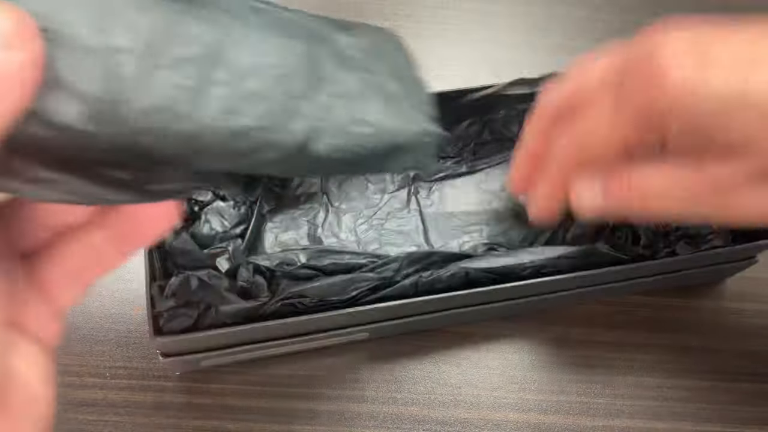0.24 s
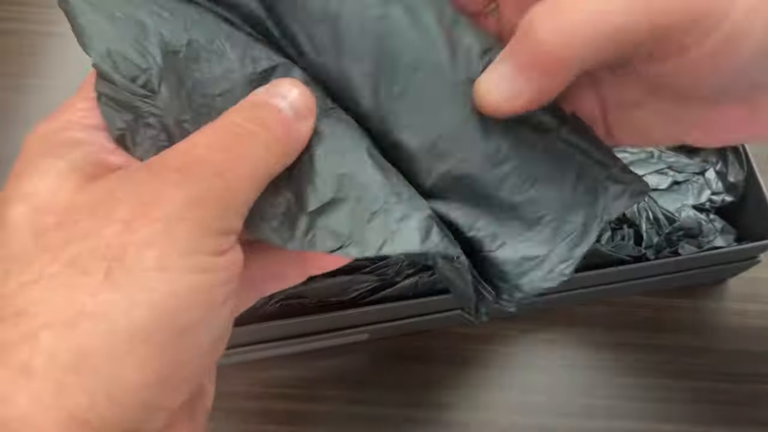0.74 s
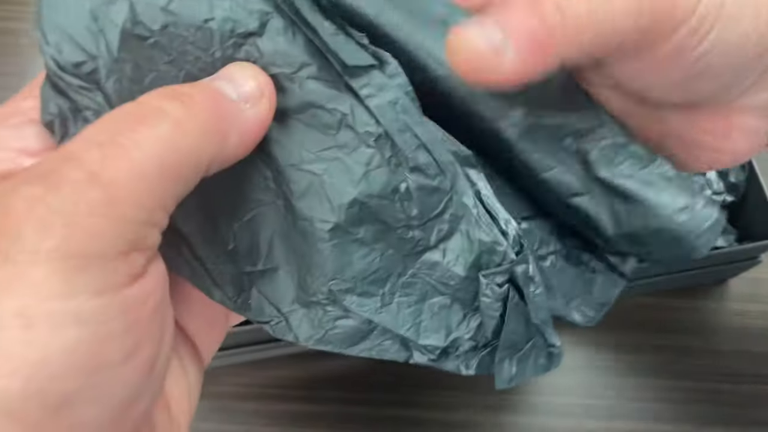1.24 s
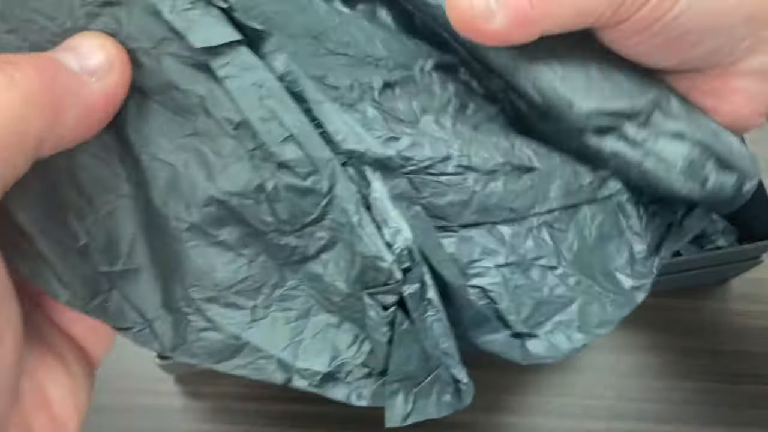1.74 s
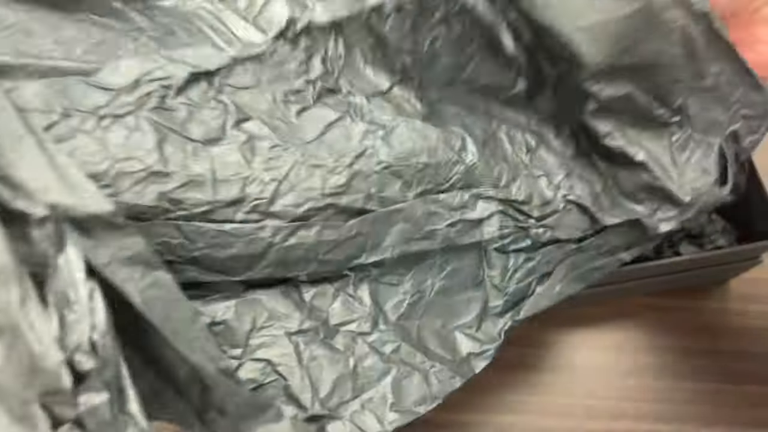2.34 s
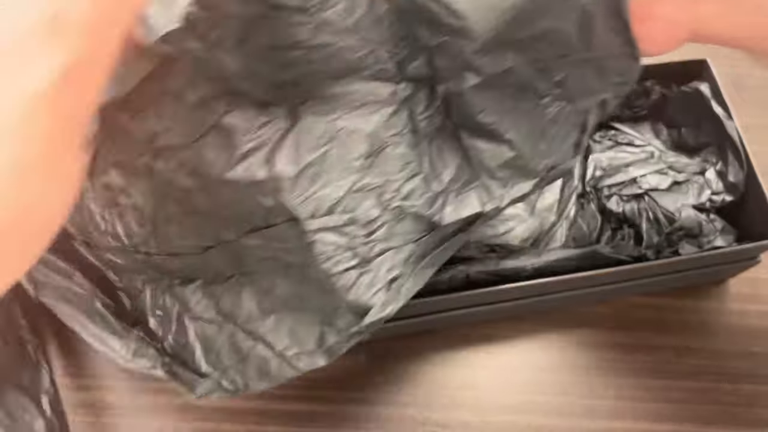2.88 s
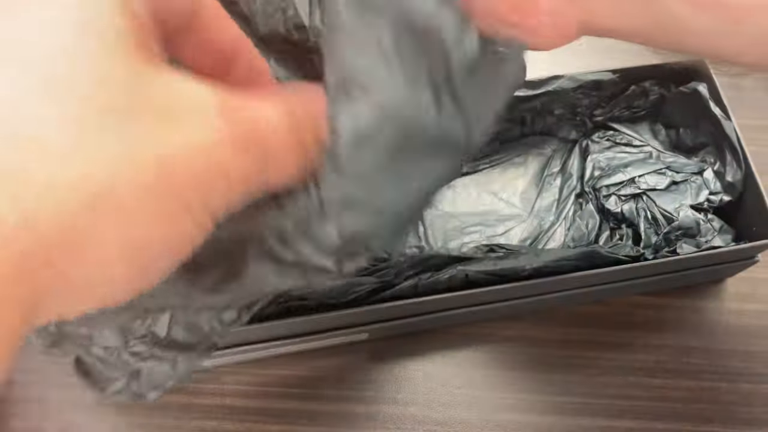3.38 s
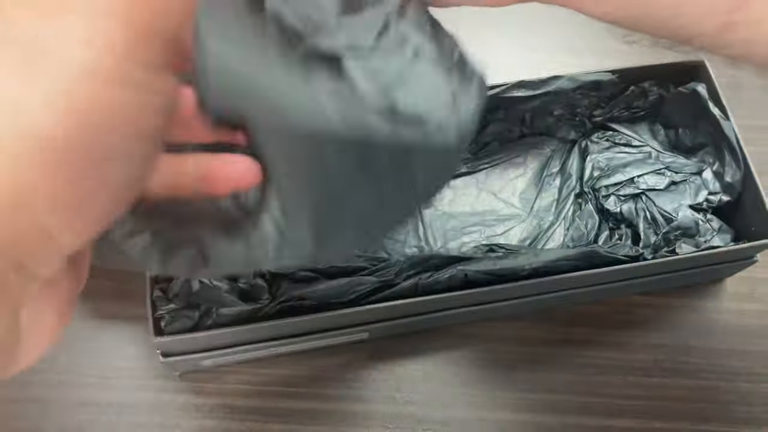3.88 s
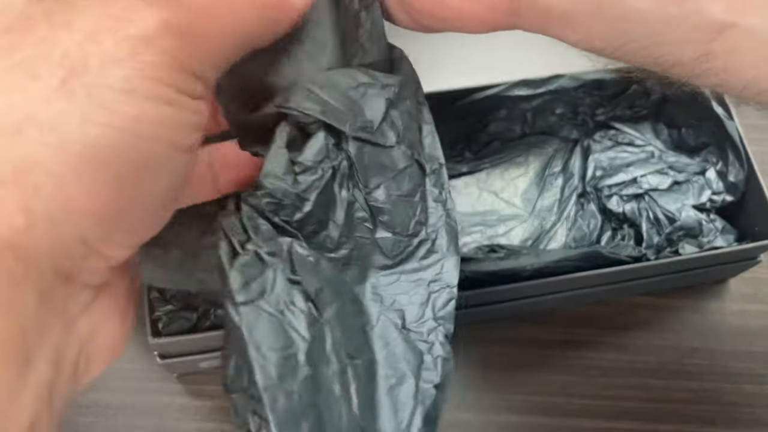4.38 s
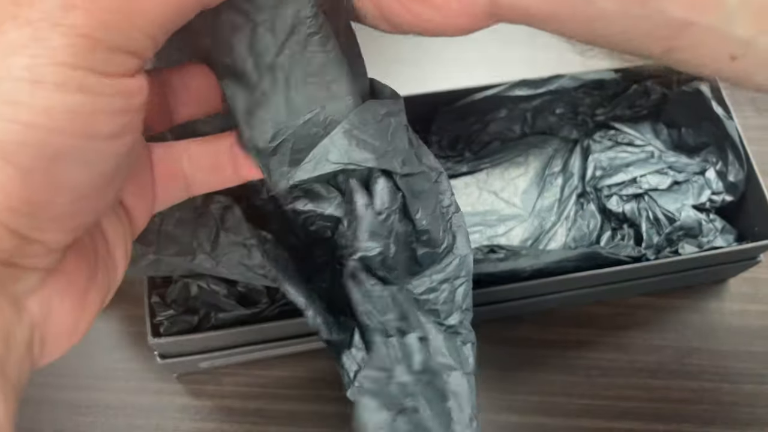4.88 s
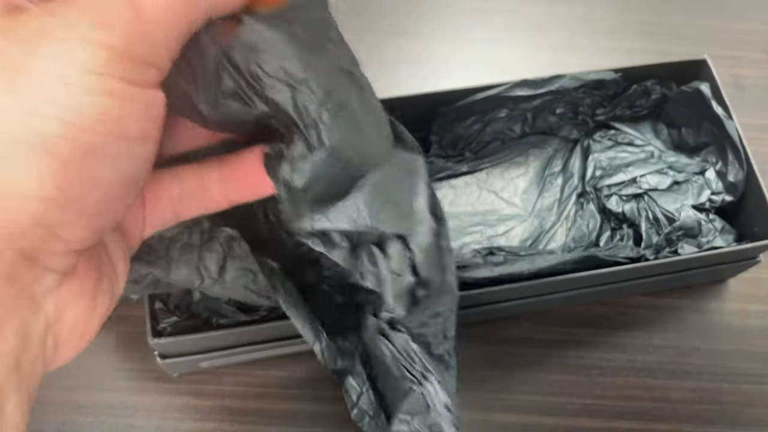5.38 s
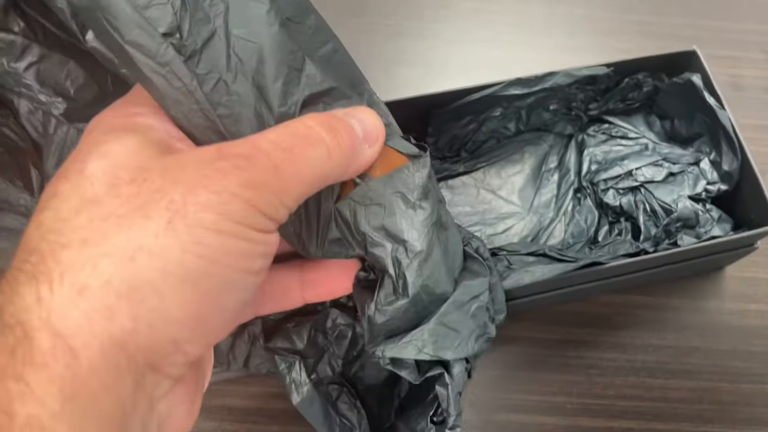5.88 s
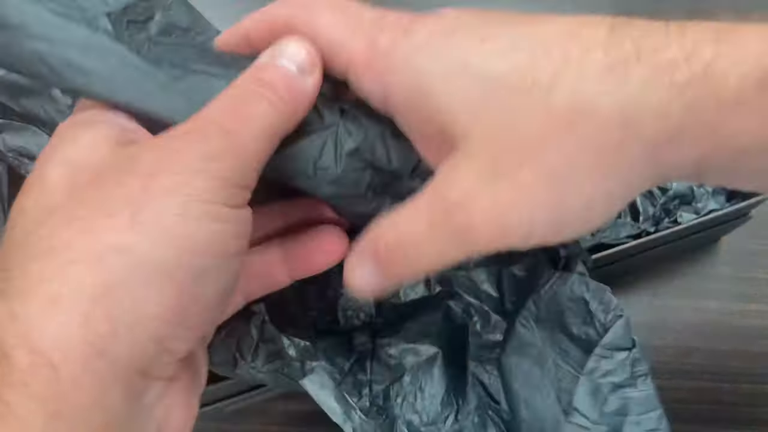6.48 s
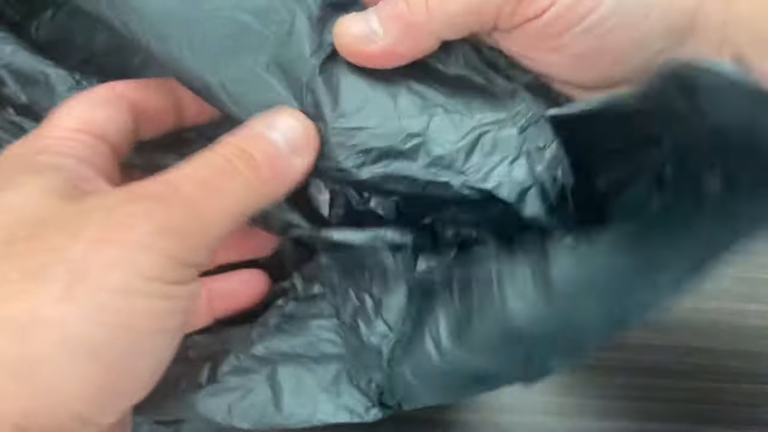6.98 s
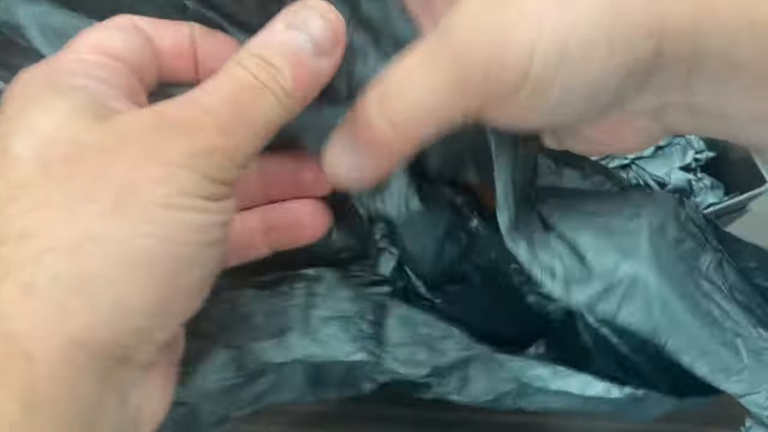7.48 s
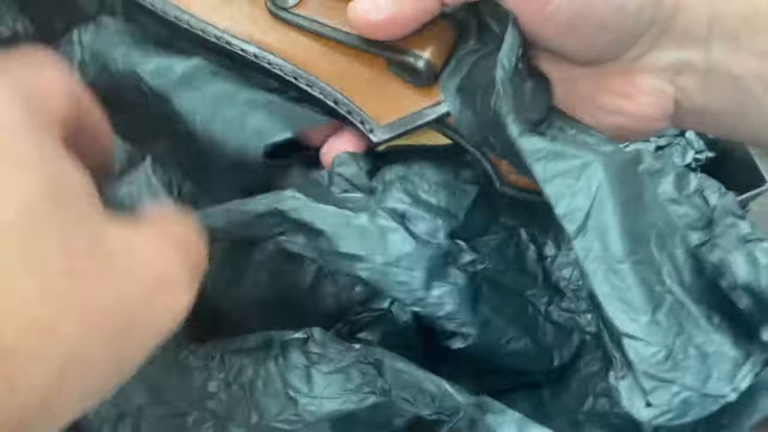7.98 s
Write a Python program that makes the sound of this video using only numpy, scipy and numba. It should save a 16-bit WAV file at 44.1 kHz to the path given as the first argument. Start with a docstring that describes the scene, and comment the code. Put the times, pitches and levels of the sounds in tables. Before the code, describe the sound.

Close to the microphone, hands unwrap an item from thin tissue paper in a small room. A light knock on a cardboard box comes right at the start, then the paper crinkles and rustles in short pulls with brief lulls. From about three seconds the rustling grows fuller and nearly continuous, dotted with sharp snaps, small pops and swishes of sliding layers. A faint low hum lies underneath.

```python
"""Unfolding tissue paper

Two hands unwrap an item from crumpled tissue above an open cardboard box on a desk. Thousands of tiny creases
buckle while the layers slide and the sheet billows; stiff folds pop or crack, fingers swish and the box is
knocked. A phone listens close by in stereo, over a small room's drone."""
import sys
import numpy as np
from scipy import signal
from scipy.fft import rfft, irfft, next_fast_len
from scipy.io import wavfile
from scipy.ndimage import map_coordinates
from numba import njit

SR = 44100
rng = np.random.default_rng(int(sys.argv[2]) if len(sys.argv) > 2 else 0)


def wrap_up_sound(samples):
    """Save the sound to the file named by the first command line argument, as 16-bit audio."""
    columns = np.atleast_2d(samples).T
    # keep every value between -1 and 1, then stretch to whole-number steps
    tamed = np.clip(columns, -1, 1)
    steps = np.round(tamed * 32767).astype(np.int16)
    wavfile.write(sys.argv[1], SR, steps)


N = 362943
TIME = np.arange(N) / SR
TOP_HZ = 15800  # upper limit of the creases and of the phone


# spectral envelope of the paper: f/Hz, level/dB
PAPER_SPECTRUM = [(60, -19), (200, -4.5), (350, 1.5), (500, -3), (660, 2), (820, -4.5), (1020, -2),
                  (1500, -5), (1850, -3), (3000, -4), (3900, -3), (5100, -4), (5750, -8.5), (7000, -2),
                  (8400, -0.5), (10000, 1), (13300, -0.5), (15700, -8)]
# band weights as the sheet opens: t/s, billow level/dB, wide fold level/dB, tight fizz level/dB
BEND_LEVELS = [(0.0, -15, -1.5, -1), (0.5, -12.5, -2.5, 3), (0.75, -10.5, -1.5, -2.5), (1.1, -11.5, -2, -1),
               (1.98, -14.5, -4, -0.5), (2.4, -8.5, -0.5, 0), (2.82, -16, -1.5, 2), (2.98, -5.5, -2.5, 2.5),
               (3.3, -5, -1, 3.5), (3.6, -7.5, -3, 2.5), (4.32, -6.5, -1.5, 2.5), (4.78, -8.5, -4, 1.5),
               (5.2, -11, -6, 3), (5.65, -8.5, -3.5, 4), (6.15, -10.5, 0.5, 1), (6.7, -6.5, -1.5, 1),
               (8.23, -7, -1, 2)]

def rustle(effort, slide_db=-4.5, surge_db=1.0, crackle_db=-11., patchy_db=0.92, billow_follow=0.71,
           edges_hz=(577., 2720., 7160.), crinkle_db=-0.5, fizz_db=-0.8):
    """Radiation from a sheet driven by buckling and friction: wide bends sound low, tight ones fizz."""
    billow, fold, fizz = curves(BEND_LEVELS)
    extra = effort - np.mean(effort)
    sliding = undb(slide_db + extra / 2) * rng.standard_normal((3, N))
    # one buckling crease sets off its neighbours, so the snaps come in surges
    grains = (creases(effort) + sliding) * undb(surge_db * walk(64))
    crackles = creases(effort, rate=260., spread_db=1.0, cycles=13.5, count=8000)  # few, pitched
    sheet = spectrum(hollow(grains + undb(crackle_db) * crackles)) * colour(PAPER_SPECTRUM)
    lowpasses = [1 / (1 + (bins() / edge) ** 8) for edge in edges_hz]
    bands = np.diff(lowpasses, axis=0, prepend=0, append=1)
    # the sheet keeps moving between pulls, so its billowing follows the effort only in part
    levels = (billow - (1 - billow_follow) * extra, fold, crinkle_db, fizz + fizz_db)
    out = 0
    for band, db in zip(bands, levels):
        patchy = irfft(sheet * band)[:, :N] * undb(patchy_db * walk(45))
        out = out + unit(patchy) * undb(effort + db)
    return out


def creases(effort, rate=4800., growth=.55, spread_db=0.5, cycles=2.44, shortest_s=7e-5, count=80000):
    """Buckling as a Poisson process: creases snap more often under effort and ring for a few cycles."""
    gap_draw, pitch_draw, decay_draw, *phases = rng.random((count, 6)).T
    size = undb(spread_db * np.minimum(rng.standard_normal(count), 2.5))
    activity = undb(growth * (effort - np.mean(effort)))
    expected_count = np.cumsum(activity) * rate / SR
    thresholds = np.cumsum(-np.log(1 - gap_draw))
    used = thresholds < expected_count[-1]
    start = np.searchsorted(expected_count, thresholds[used]) / SR
    hz = 150 + (TOP_HZ - 150) * pitch_draw[used] ** 2
    t60 = shortest_s + cycles * (.5 + decay_draw[used]) / hz
    size = size[used] * np.sqrt(np.sqrt(hz) / t60)  # equal energy per Hz
    # three paths: the direct sound, then each channel's own part
    paths = np.array([ring(start, hz, t60, size, 2 * np.pi * phase[used]) for phase in phases])
    return unit(paths / np.sqrt(activity))


def hollow(x, echo=0.21, lag_s=.0005, motion=0.454, motion_hz=11.85):
    """Comb filtering: reflections from the moving hands and folds shift the colour of the sound."""
    for lag, sign in ((lag_s, 1), (np.pi * lag_s, -1)):
        delayed = np.arange(N) - SR * lag * np.exp(motion * walk(motion_hz))
        x = x + sign * echo * np.array([map_coordinates(row, [delayed], order=3) for row in x])
    return x


# pulls of the hands: start t/s, duration/s, level/dB
HAND_PULLS = [(0.017,.116,-49), (0.426,.13,-49.5), (0.575,.249,-47), (0.86,.08,-43), (0.975,.095,-44.5),
              (1.2,.17,-49.5), (1.425,.16,-48), (1.611,.09,-51), (1.715,.06,-45), (1.86,.061,-46.5),
              (1.961,.125,-44.5), (2.125,.319,-49), (2.524,.132,-47.5), (2.845,.08,-51.5), (2.953,.105,-42),
              (3.09,.23,-45), (3.347,.156,-47.5), (3.548,.482,-46.5), (4.115,.235,-47), (4.369,.046,-44.5),
              (4.565,.1,-46.5), (4.67,.23,-45), (5.01,.085,-45), (5.38,.1,-46), (5.58,.29,-45),
              (5.89,.13,-48.5), (6.185,.4,-47.5), (6.655,.09,-44.5), (6.865,.337,-45), (7.209,.111,-42.5),
              (7.362,.088,-43.5), (7.475,.2,-45.5), (7.72,.08,-46.5), (7.83,.075,-42.5), (8.136,.097,-45.5)]
# crinkle while the paper is only held: t/s, level/dB
HOLD_LEVELS = [(0.0, -54), (0.19, -53), (0.27, -63), (0.405, -68), (0.45, -54), (1.05, -51), (1.16, -54.5),
               (1.3, -52), (2.45, -54), (2.68, -57), (2.76, -60), (3.0, -49), (4.08, -54), (4.52, -54.5),
               (4.95, -48), (5.5, -47.5), (6.1, -53), (6.8, -47), (8.05, -50)]

def pulling(attack_db_per_s=540.5, swell_db=2, release_db_per_s=220, unsteady_db=0.43):
    """Incoherent addition: the powers of holding and pulling sum to the hands' effort, in dB."""
    power = undb(curves(HOLD_LEVELS)[0]) ** 2
    for start, length, db in HAND_PULLS:
        progress = np.clip((TIME - start) / length, 0, 1)
        attack = attack_db_per_s * np.maximum(start - TIME, 0)
        sag = swell_db * (2 * progress - 1) ** 2  # zero at mid-pull
        release = release_db_per_s * np.maximum(TIME - start - length, 0)
        power = power + undb(db - attack - sag - release) ** 2
    return 10 * np.log10(power) + unsteady_db * walk(18)


# stiff folds that flip: t/s, level/dB, f/Hz
STIFF_FOLDS = [(0.423,-24.5,2500), (1.891,-23,2530), (2.334,-24,2300), (2.7115,-28,2230), (2.728,-31,3900),
               (2.775,-25.5,2590), (2.839,-28,2340), (2.8502,-24.5,4050), (2.991,-25,895),
               (3.2445,-21,3670), (4.309,-26,2500), (4.5547,-28,3200), (4.6852,-18.5,4200),
               (5.3622,-25.5,3500), (5.644,-20,4070), (6.441,-20.5,2250), (6.952,-29,2100),
               (7.0495,-29,1110), (7.2405,-22.5,990), (7.368,-18.5,4000), (7.4163,-21,2000),
               (7.438,-20,2270), (7.4615,-21,2170), (7.547,-26,2050)]

def folds(pop_db=-2.5, cycles=9.1, crack_db=-9.0, crack_s=0.0031, delay_s=0.00079):
    """Bistability: a stiff fold flips with a pitched pop, and a crack runs along its fibres."""
    s, db, hz = np.array(STIFF_FOLDS, float).T.copy()
    start = s + delay_s
    phases = (0, np.pi / 2, -np.pi / 2)  # the scatter is a quarter cycle off the direct sound
    pops = np.array([ring(start, hz, cycles / hz, undb(db + pop_db), np.full(len(s), phase))
                     for phase in phases])
    crack = decays(start, db + crack_db, crack_s) * rng.standard_normal((3, N))
    return pops + shape(crack, colour(PAPER_SPECTRUM))


# thin creases that give way: t/s, level/dB
THIN_SNAPS = [(0.1984,-37), (0.2188,-33), (0.414,-32), (0.438,-27), (1.2995,-28), (1.439,-28), (1.865,-39),
              (2.5627,-28), (2.7124,-42), (2.7818,-41), (2.8512,-37), (2.948,-25), (3.276,-21),
              (3.8014,-23), (4.1007,-35), (4.4705,-34), (4.504,-24), (4.556,-28), (4.567,-28),
              (4.685,-22.5), (5.043,-21), (5.129,-26), (5.33,-29.5), (5.3628,-22), (5.6544,-25),
              (6.141,-29), (6.8537,-21), (7.1787,-28), (7.8764,-25), (7.9566,-28)]

def snaps(snap_db=-3.0, decay_s=0.0015, low_hz=4560.0):
    """Snap-through: a thin crease gives way in a brief, bright crack with no body."""
    s, db = np.array(THIN_SNAPS, float).T
    bright = colour(PAPER_SPECTRUM) / (1 + (low_hz / bins()) ** 3)
    fibres = unit(shape(rng.standard_normal((3, N)), bright))
    return decays(s, db + snap_db, decay_s) * fibres


# slides along the paper: t/s, half duration/s, level/dB, centre f/Hz
SLIDES = [(0.434, 0.011, -42.5, 3300), (0.894, 0.056, -44.5, 12300), (1.738, 0.022, -44, 2220),
          (2.067, 0.025, -44.5, 2100), (3.299, 0.015, -38.5, 3800), (4.402, 0.015, -44, 4000),
          (4.78, 0.044, -38.5, 3340), (4.79, .025, -39, 6500), (6.641, 0.013, -39.5, 3670),
          (6.707, 0.035, -40, 4400), (6.725, 0.023, -40, 5800), (6.717, 0.031, -38, 12500),
          (7.086, 0.01, -43, 900), (7.146, 0.045, -40, 5200), (7.258, 0.033, -42, 1090),
          (7.388, 0.022, -38.5, 4500)]

def swishes(catch_db=3.0, catch_hz=120.0, relative_width=0.7):
    """Stick-slip friction: skin and layers catch on the paper in short, grainy scrunches."""
    out = np.zeros((3, N))
    friction = rng.standard_normal((3, N)) * undb(catch_db * walk(catch_hz))
    for s, half, db, hz in SLIDES:
        near = abs(TIME - s) < 3 * half
        peak = signal.iirpeak(hz, 1 / relative_width, fs=SR)
        hiss = signal.lfilter(*peak, signal.lfilter(*peak, friction[:, near]))
        out[:, near] += unit(hiss) * undb(db) * swell(s, half)[near]
    return out


# resonances of the paper sleeve: t/s, half duration/s, level/dB, f/Hz, bandwidth/Hz
SLEEVE_MODES = [(0.8, 0.31, -52.5, 1310, 220), (1.6, 0.24, -51.5, 1850, 300), (2.25, 0.26, -51, 2050, 400),
                (4.197, 0.12, -55, 2110, 70), (4.363, 0.07, -46.5, 582, 90), (6.9, 0.099, -53, 1950, 110),
                (7.38, 0.12, -49.5, 2060, 110), (8.19, .06, -48, 950, 400)]

def sleeve(catch_db=3.0, catch_hz=84.0, drift=0.016, drift_hz=6.3):
    """Cavity resonance: the rubbed sleeve around the item rings, bending in pitch as it flexes."""
    out = np.zeros((3, N))
    friction = rng.standard_normal((3, N)) * undb(catch_db * walk(catch_hz))
    flexed_time = TIME + np.cumsum(drift * walk(drift_hz)) / SR
    for s, half, db, hz, width_hz in SLEEVE_MODES:
        near = abs(TIME - s) < 3 * half
        carrier = np.exp(2j * np.pi * hz * flexed_time[near])
        pole = np.exp(-np.pi * width_hz / SR)
        amplitude = signal.lfilter([1], [1, -pole], friction[:, near] / carrier)
        out[:, near] += unit((carrier * amplitude).real) * undb(db) * swell(s, half)[near]
    return out


# knocks on the box: t/s, level/dB, relative crack level/dB
BOX_KNOCKS = [(0.1102, -24, -20), (0.1144, -38, 2), (0.1543, -39, -20)]
# modes of the cardboard: f/Hz, level/dB, T60/s
BOX_MODES = [(312, -9, 0.035), (1038, 1, 0.016), (1250, 0.5, 0.016), (1800, -19, .025), (2320, -13, 0.034),
             (2840, -18, 0.039)]

def box(crack_s=0.00081, crack_hz=(1410., 3700.)):
    """Impact excitation: the knocked box rings in damped modes; its edge cracks at each contact."""
    struck_modes = [(*knock, *mode) for knock in BOX_KNOCKS for mode in BOX_MODES]
    s, db, _, hz, mode_db, t60 = np.array(struck_modes, float).T.copy()
    contact = sum(undb(knock_db + crack_db) * (TIME >= at) * np.exp(-abs(TIME - at) / crack_s)
                  for at, knock_db, crack_db in BOX_KNOCKS)
    crack = unit_band(rng.standard_normal(N), crack_hz, order=3)
    # neighbouring modes swing in opposite directions, so the knock swells over a cycle
    phase = np.pi * np.tile(np.arange(len(BOX_MODES)), len(BOX_KNOCKS))
    return ring(s, hz, t60, undb(db + mode_db), phase) + contact * crack


# flaps of the loose sheet: t/s, level/dB, centre f/Hz
SHEET_FLAPS = [(1.76, -52, 326), (1.865, -47, 250), (2.995, -39.5, 427), (3.042, -44, 506),
               (7.05, -50, 450)]

def flaps(half_s=0.014):
    """Pressure pulse: the loose sheet swings taut with a soft, low slap of air, an octave wide."""
    gust = rng.standard_normal(N)
    return sum(unit_band(gust, [hz / np.sqrt(2), hz * np.sqrt(2)]) * undb(db) * swell(s, half_s)
               for s, db, hz in SHEET_FLAPS)


def wafts(effort, waft_db=-2.0, band_hz=(35., 179.), follow=0.95):
    """Air displacement: the billowing sheet pushes out a soft flutter in the bass."""
    air = unit_band(rng.standard_normal(N), band_hz)
    push_db = effort + curves(BEND_LEVELS)[0]
    return air * undb(follow * push_db + (1 - follow) * np.mean(push_db) + waft_db)


# spectral envelope of the drone: f/Hz, level/dB
ROOM_SPECTRUM = [(20, -14), (45, -7), (70, 1.5), (105, -1.5), (128, 3), (160, -4.5), (230, -7), (350, -25),
                 (1500, -31), (5000, -36), (15000, -129.5)]

def room(drone_db=-49.5, waver_db=0.43, side_db=-14.5, wide_hz=1200.,
         hum_hz=119.5, hum_db=-58, flutter_db=3.5):
    """Ambient noise: a drone and a fluttering mains hum; long waves reach both channels nearly alike."""
    mid = shape(rng.standard_normal(N), colour(ROOM_SPECTRUM))
    width = np.minimum(undb(side_db) + bins() / wide_hz / 2, 1)
    side = shape(rng.standard_normal(N), colour(ROOM_SPECTRUM) * width)
    drone = unit(np.array([mid + side, mid - side])) * undb(drone_db + waver_db * walk(13))
    hum = unit(np.sin(2 * np.pi * hum_hz * TIME) * undb(flutter_db * walk(15)))
    return drone + undb(hum_db) * hum


# the stereo image: f/Hz, left phase lead/rad, coherence (0-1), left minus right level/dB
STEREO_IMAGE = [(350, -0.4, 0.88, -1.8), (620, 1.28, 0.8, 2.3), (1000, 0.91, 0.84, 2.5),
                (2050, -0.08, 0.4, 0.4), (3000, 1.57, 0.51, 5.7), (4200, 0.52, 0.68, 3.3),
                (5750, -1.13, 0.48, -1.2), (6800, -1.46, 0.59, 2.1), (7700, -2.96, 0.95, 0.9),
                (8400, -3.13, 0.99, 0.0), (9000, -3.17, 0.99, -0.0), (9800, -3.57, 0.88, -0.2),
                (11500, -5.12, 0.66, -0.2), (12600, -6.25, 0.96, 0.1)]

def stereo_image(x):
    """Partial coherence: the two channels share the direct sound, shifted in phase; each has its own part."""
    hz, *columns = np.transpose(STEREO_IMAGE)
    lead, coherence, balance_db = (np.interp(bins(), hz, c) for c in columns)
    paths = spectrum(x)
    direct = paths[0] * np.exp(.5j * np.array([lead, -lead]))
    heard = np.sqrt(coherence) * direct + np.sqrt(1 - coherence) * paths[1:]
    return irfft(heard * undb(np.array([balance_db, -balance_db]) / 2))[:, :N]


@njit
def ring(start, hz, t60, size, phase):
    """Superposition of damped sinusoids."""
    out = np.zeros(N)
    for k in range(len(start)):
        pole = np.exp((2j * np.pi * hz[k] - np.log(1000) / t60[k]) / SR)
        z, first = size[k] * np.exp(1j * phase[k]), int(start[k] * SR)
        for i in range(max(first, 0), min(N, first + int(t60[k] * SR) + 2)):
            out[i] += z.imag
            z *= pole
    return out


def decays(start, db, decay_s):
    """Envelope of exponential decays, one from each start."""
    hits = np.zeros(N)
    hits[(start * SR).astype(int)] = undb(db)
    return signal.lfilter([1], [1, -np.exp(-1 / (decay_s * SR))], hits)


def swell(centre_s, half_s):
    """Gaussian envelope."""
    return np.exp(-((TIME - centre_s) / half_s) ** 2)


def curves(table):
    """Linear interpolation of each column in time."""
    s, *columns = np.transpose(table)
    return [np.interp(TIME, s, c) for c in columns]


def walk(rate):
    """Low-pass noise of rms 1, changing about rate times a second."""
    return unit(shape(rng.standard_normal(N), 1 / (1 + (2 * bins() / rate) ** 4)))


def undb(db):
    """Decibels to gain."""
    return 10 ** (np.asarray(db) / 20)


def unit(x):
    """Scale to rms 1."""
    return x / np.sqrt(np.mean(x ** 2))


def unit_band(x, edges_hz, order=2):
    """Band-pass, then scale to rms 1."""
    return unit(signal.sosfilt(signal.butter(order, edges_hz, "band", fs=SR, output="sos"), x))


def bins():
    """Frequencies of a spectrum padded against wrap-around."""
    size = next_fast_len(N + SR // 2, real=True)
    return np.maximum(np.arange(size // 2 + 1) * SR / size, 1)


def spectrum(x):
    """Zero-padded Fourier transform."""
    return rfft(x, 2 * (len(bins()) - 1))


def shape(x, gain):
    """Filter by a gain for each frequency."""
    return irfft(spectrum(x) * gain)[..., :N]


def colour(points):
    """Gain for each frequency from (f/Hz, level/dB) points."""
    hz, db = np.transpose(points)
    return undb(np.interp(np.log(bins()), np.log(hz), db))


def scene():
    """Superposition of paper, box and moving air over the room."""
    effort = pulling()
    paper = rustle(effort) + folds() + snaps() + swishes() + sleeve()
    return stereo_image(paper) + box() + wafts(effort) + flaps() + room()


def record(dry):
    """Band limiting: the phone cuts the top of the treble."""
    return signal.sosfiltfilt(signal.ellip(10, .1, 50, TOP_HZ, fs=SR, output="sos"), dry)


dry = scene()
out = record(dry)
wrap_up_sound(out)
```